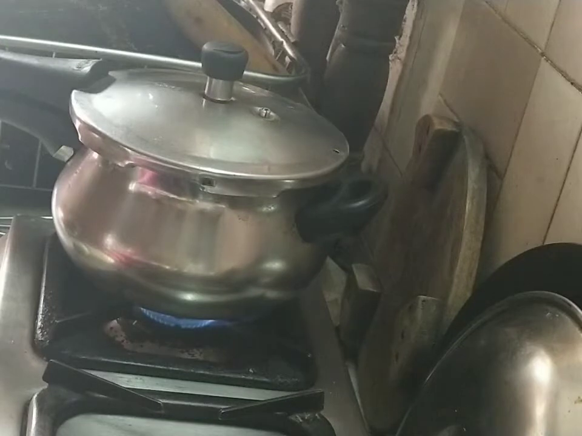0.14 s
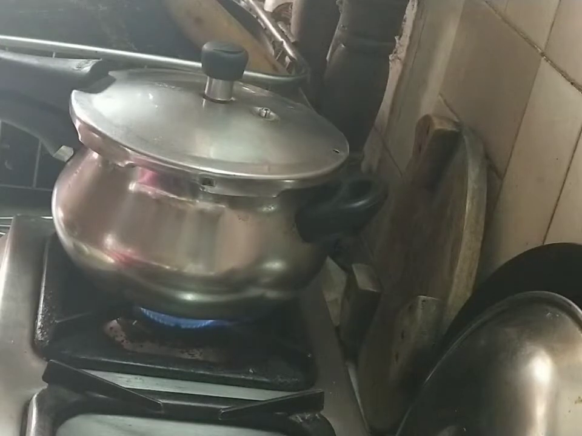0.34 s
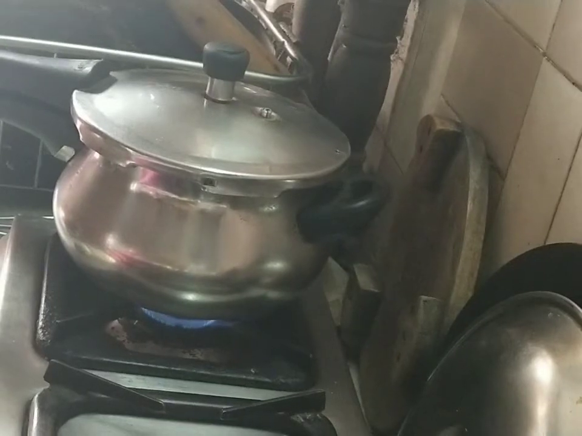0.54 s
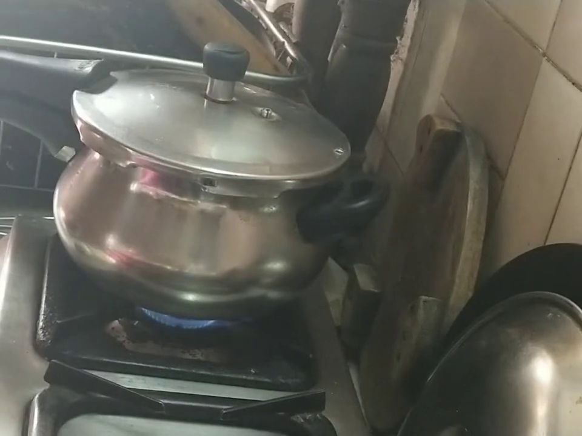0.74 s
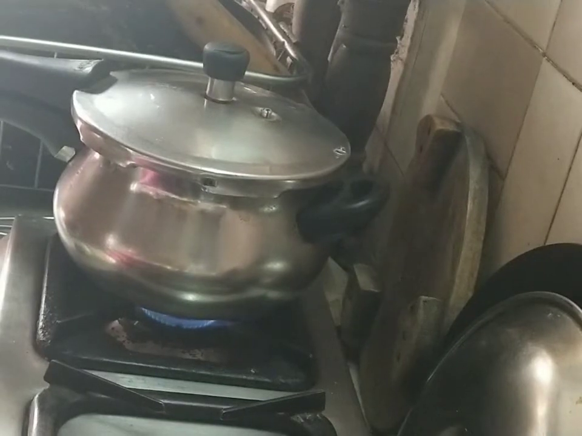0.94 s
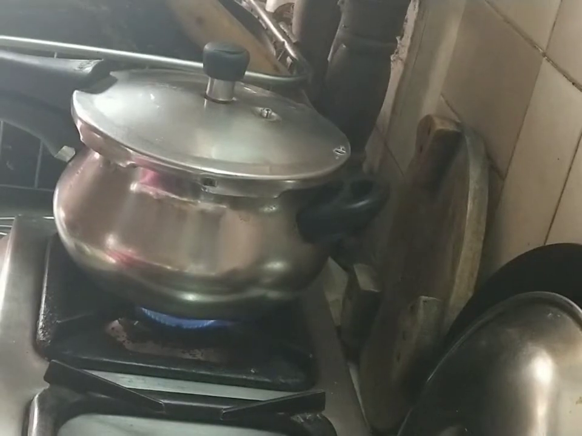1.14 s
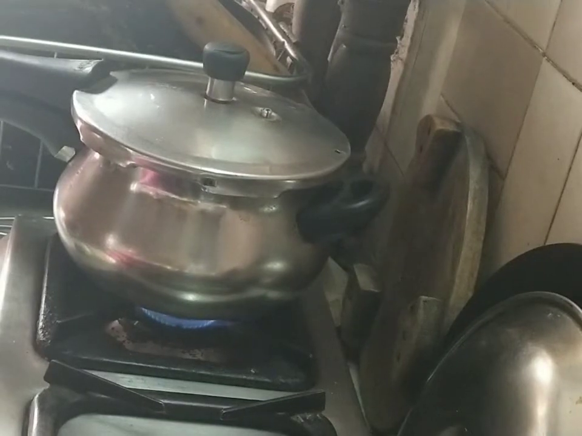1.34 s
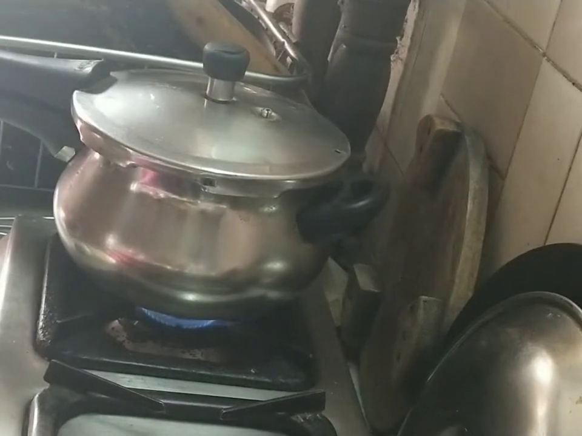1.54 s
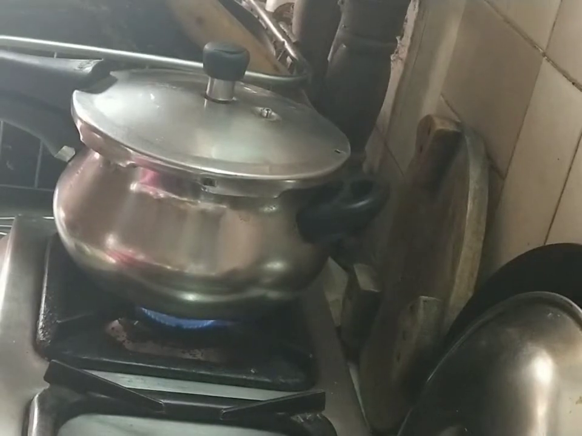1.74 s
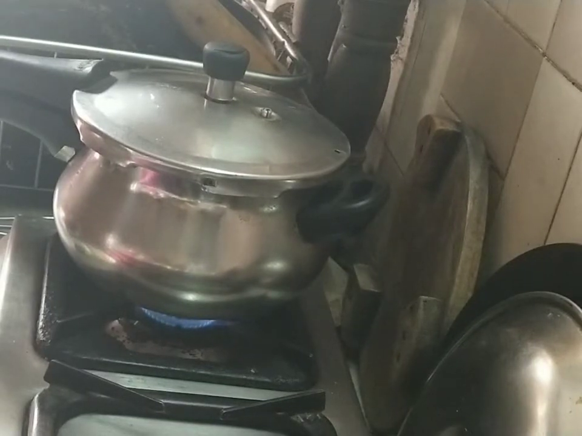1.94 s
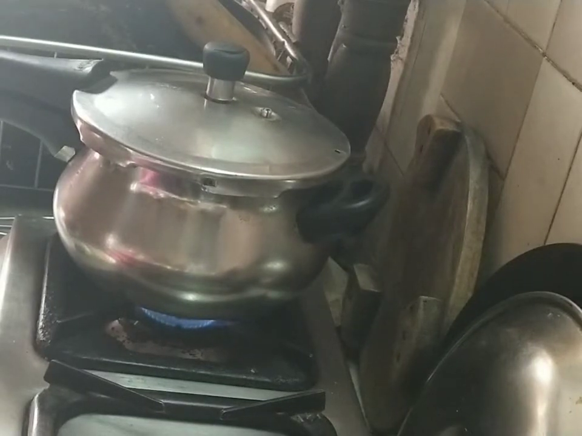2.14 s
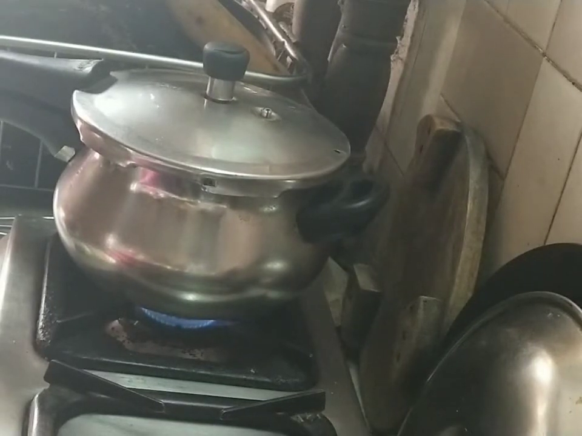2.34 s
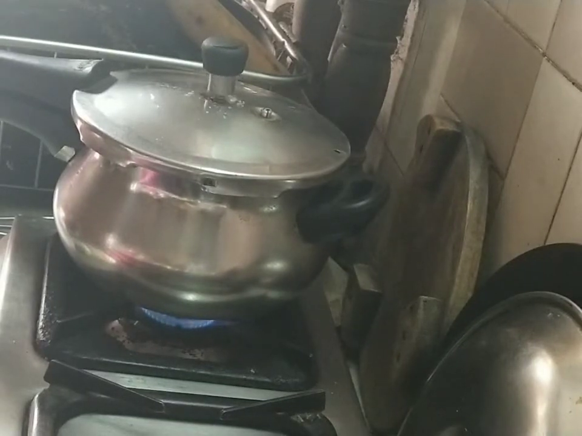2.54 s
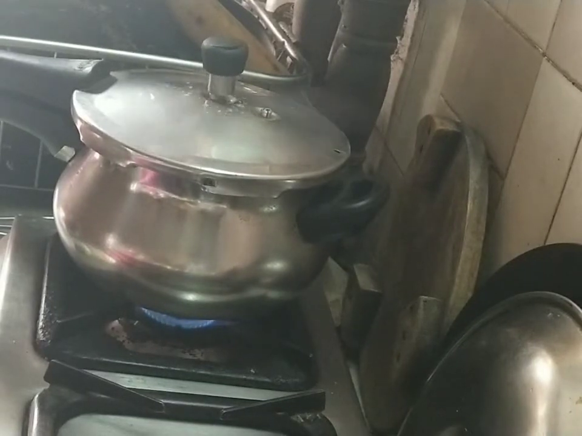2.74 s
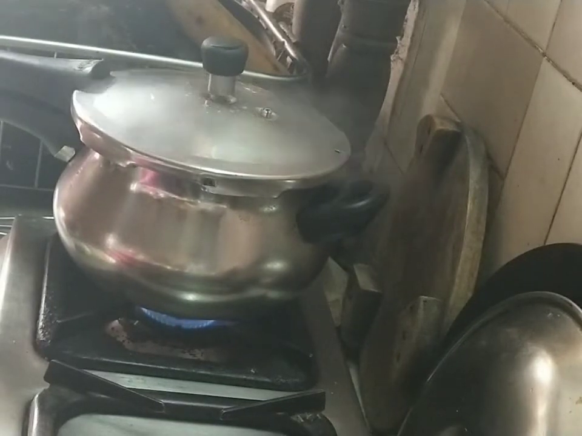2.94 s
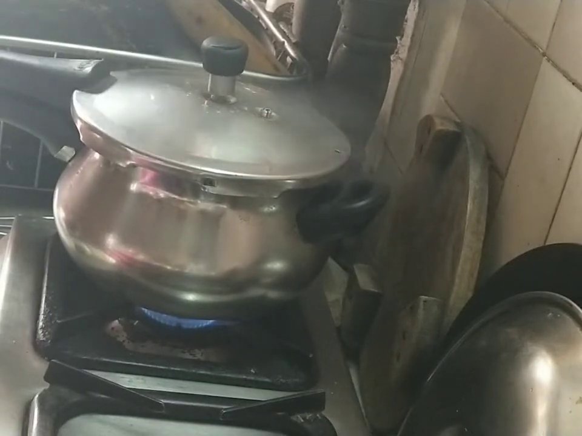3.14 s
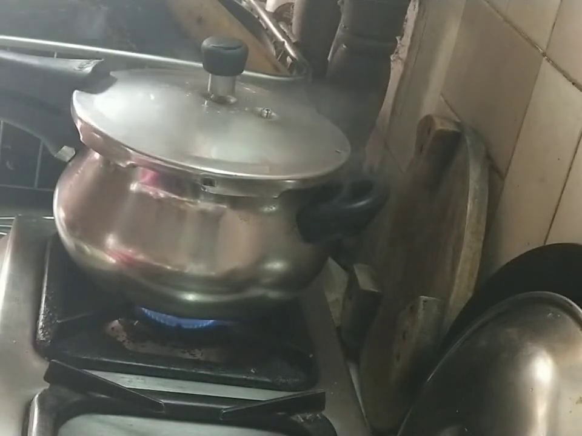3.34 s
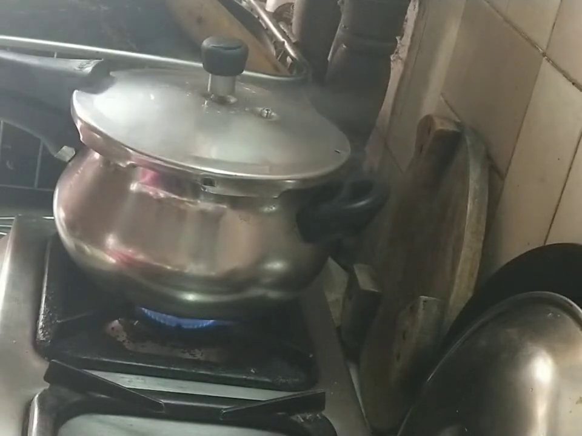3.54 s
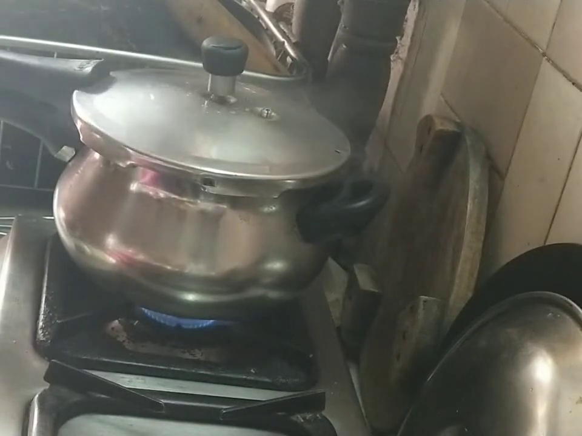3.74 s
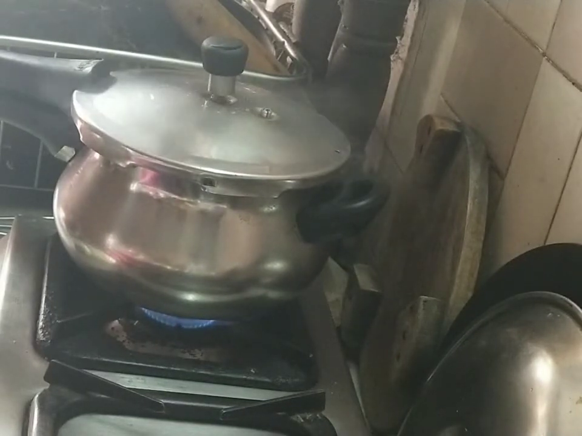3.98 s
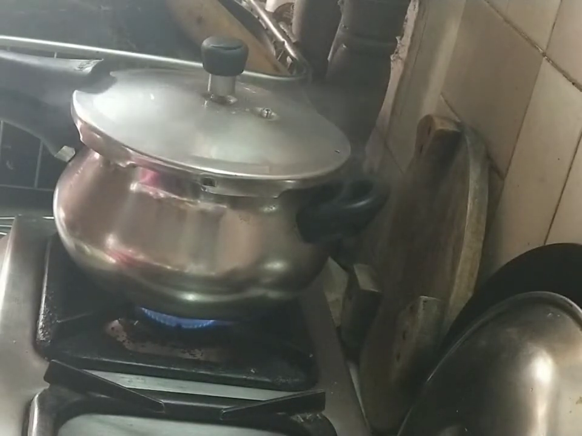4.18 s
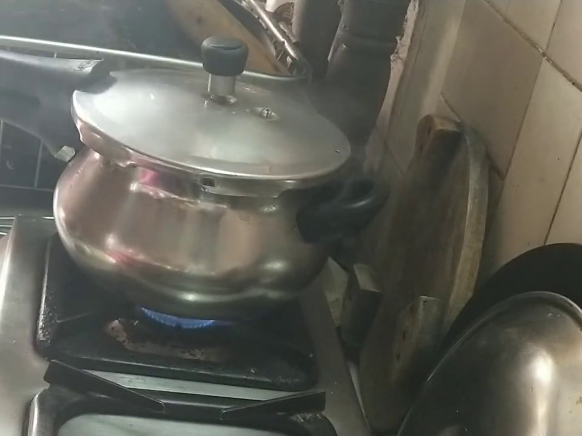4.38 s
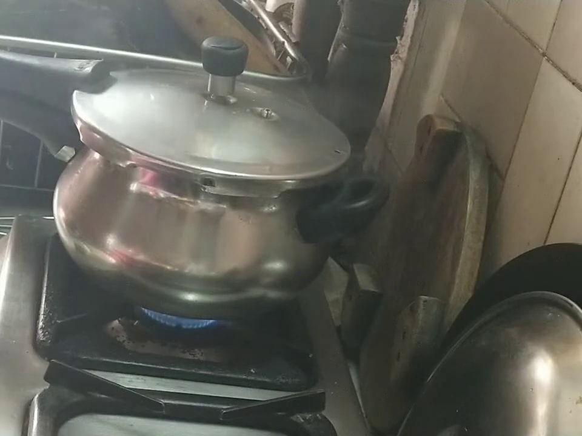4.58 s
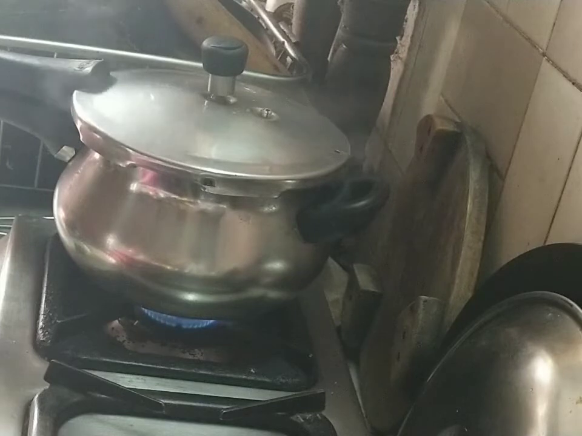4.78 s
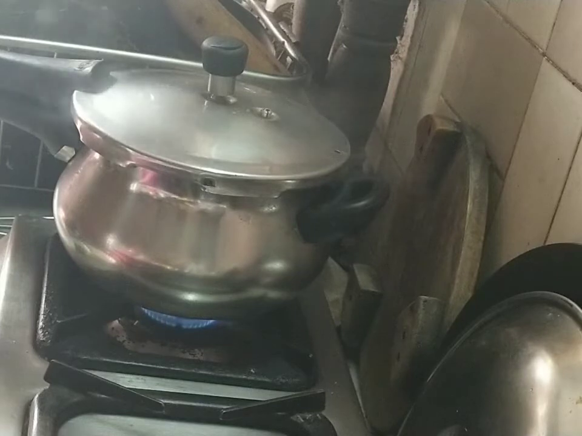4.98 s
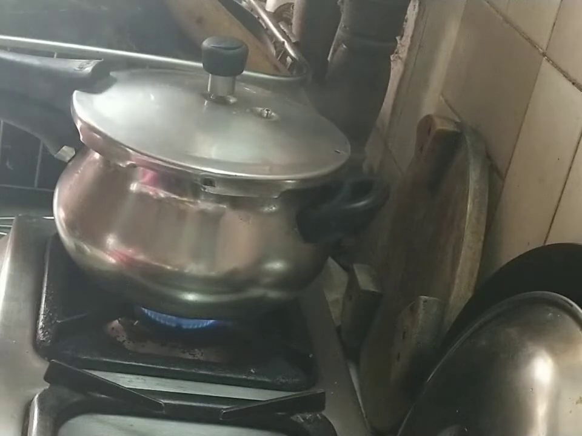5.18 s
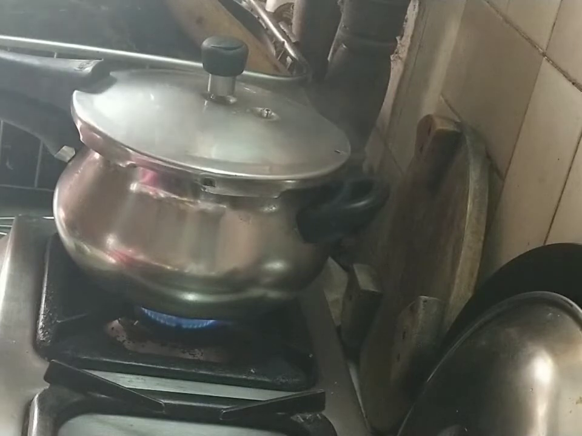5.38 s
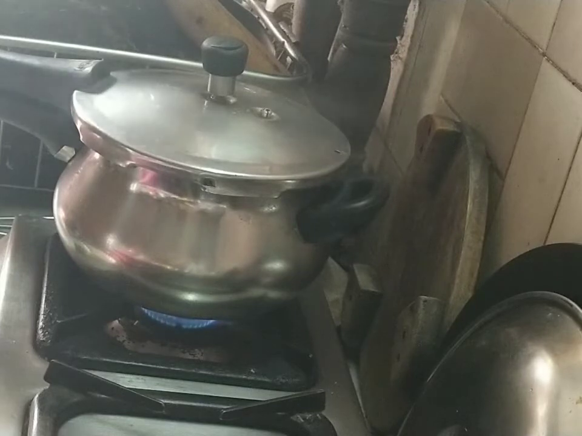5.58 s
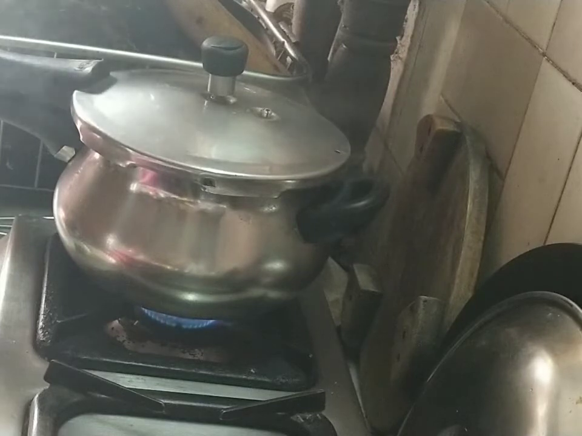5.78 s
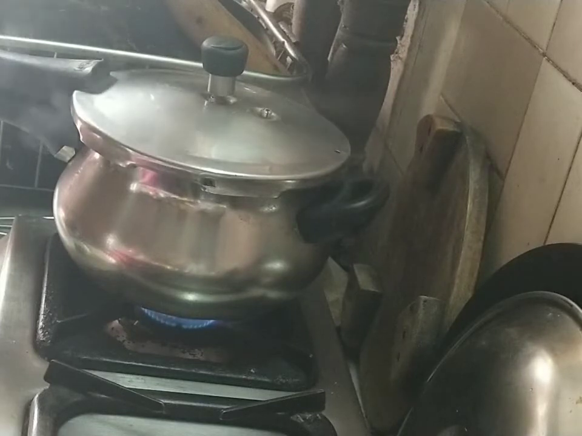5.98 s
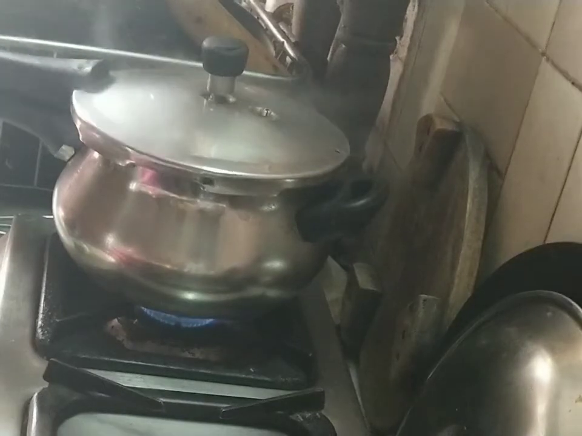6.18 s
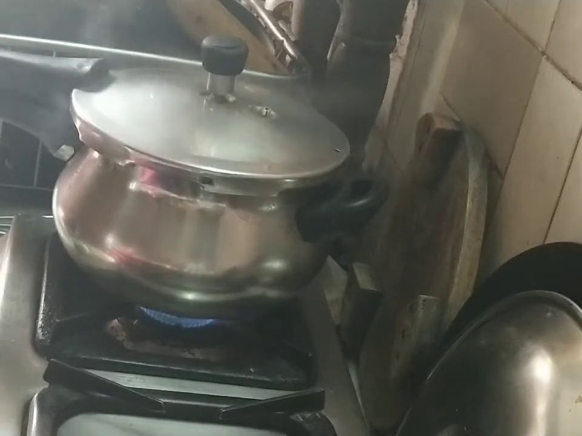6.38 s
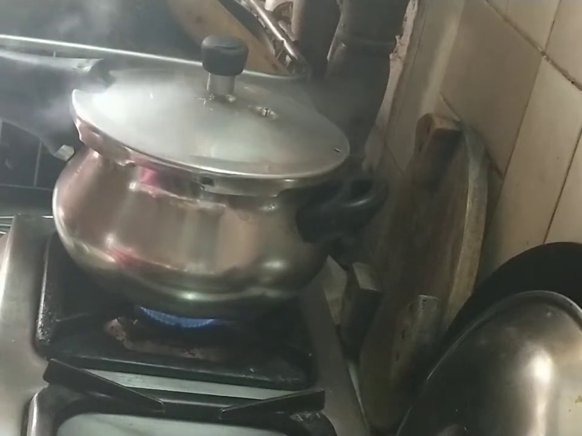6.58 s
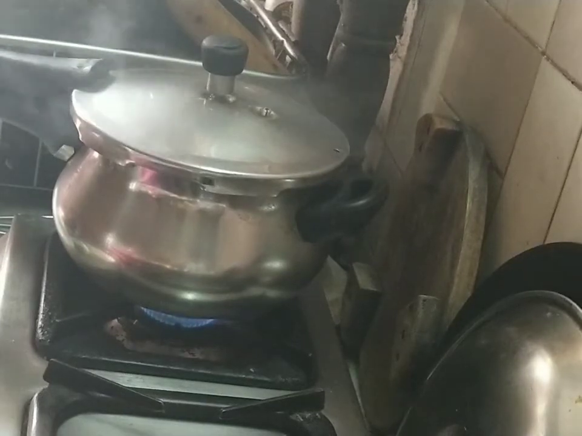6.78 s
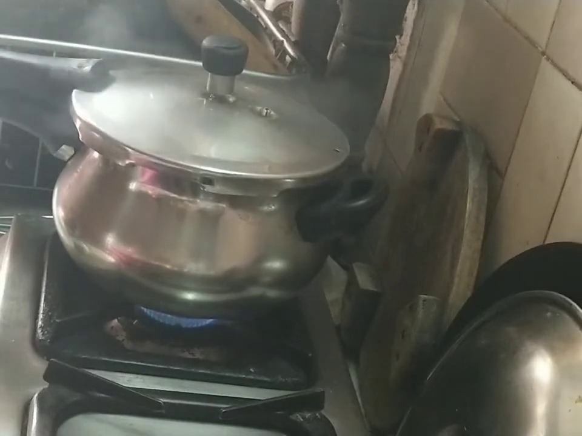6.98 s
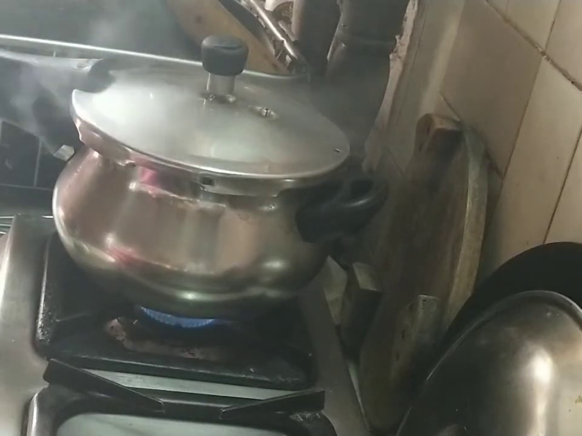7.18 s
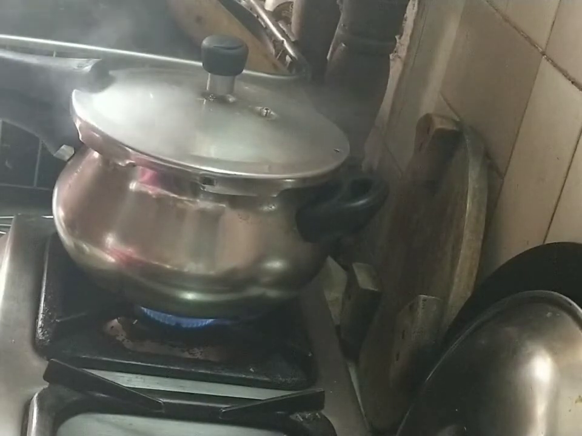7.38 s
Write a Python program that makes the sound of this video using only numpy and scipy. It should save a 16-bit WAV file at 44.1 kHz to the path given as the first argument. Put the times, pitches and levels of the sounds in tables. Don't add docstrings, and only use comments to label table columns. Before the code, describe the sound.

Pot on a gas flame: soft hiss and tiny metal clinks, an abrupt change, then a valve lifts and steam rushes out harshly until the end.

```python
import sys
import numpy as np
from scipy import signal
from scipy.fft import rfft, irfft, next_fast_len
from scipy.io import wavfile
from scipy.ndimage import uniform_filter1d, map_coordinates

SR = 44100
rng = np.random.default_rng(int(sys.argv[2]) if len(sys.argv) > 2 else 0)


def put_to_file(sound):
    columns = np.atleast_2d(sound).T
    safe = np.clip(columns, -1, 1)
    whole_steps = np.round(safe * 32767)
    wavfile.write(sys.argv[1], SR, whole_steps.astype(np.int16))


def boost(x):
    u = np.asarray(x, float) / 20
    return 10 ** u


N = 327222
TIME = np.arange(N) / SR
JUMP_S = 1.4705
# (right port later by [s], level [dB], left louder by [dB])
PATHS = [(.00016, -0.5, 5.2), (-.00034, -2.5, -0.5), (-.00007, -3, -2), (.00043, -5.5, 8)]


def unit(x):
    return x / np.sqrt(np.mean(x ** 2) + 1e-20)


def along(points, hz):
    f, value = np.transpose(points)
    return np.interp(np.log(hz + 1), np.log(f + 1), value)


def curves(rows):
    s, *columns = np.transpose(rows)
    return [np.interp(TIME, s, column) for column in columns]


def wobble(rate):
    return map_coordinates(rng.standard_normal(int(N * rate / SR) + 4), [TIME * rate])


def filtered(x, response):
    m = next_fast_len(N + SR // 2)
    return irfft(rfft(x, m) * response(np.fft.rfftfreq(m, 1 / SR)), m)[..., :N]


def turbulence(patchy_db, channels=1):
    z = signal.stft(rng.standard_normal((channels, N)), nperseg=512)[2]
    field = uniform_filter1d(rng.standard_normal(z.shape[1:]), size=8, axis=0)
    field = uniform_filter1d(field, size=10, axis=1)
    patchy = z * boost(patchy_db * unit(field))
    return unit(signal.istft(patchy, nperseg=512)[1][:, :N])


def jet():
    # (frequency [Hz], level [dB per Hz])
    leak_spectrum = [(410, -49), (700, -19), (943, -25), (1300, -23), (1410, -20.5), (2830, -19),
                     (3380, -24), (3800, -17.5), (5200, -12.5), (6910, 0.5), (8720, -17.5), (9790, -12),
                     (11600, -19), (14100, -15), (15400, -15.5)]
    # (frequency [Hz], level [dB per Hz])
    roar_spectrum = [(180, -42), (300, -20), (951, -19), (1780, -14.5), (1930, -16), (3220, -8.5),
                     (3920, -8.5), (4470, -5.5), (4940, -9.5), (7340, 2.5), (8510, -8), (10700, -11.5),
                     (11800, -11.5), (13500, -12.5), (15400, -10)]
    # (time [s], level [dB])
    flow = [
        (1.48, -38.5),
        (1.506, -37),
        (1.874, -36),
        (2.05, -37),
        (2.37, -31.5),
        (2.44, -25.5),
        (2.506, -13),
        (2.62, -14.6),
        (7.42, -14.7),
    ]
    lift_s, fizz_settles_s = 2.47, .06
    leak_fizz_db, lifting_fizz_db, roar_fizz_db = .7, -1.5, 5.3
    leak_pan_db, roar_pan_db = 1.365, -.325

    level_db, = curves(flow)
    lift = np.clip((level_db + 30.5) / 17, 0, 1) * np.pi / 2
    leak = unit(filtered(turbulence(1.4, len(PATHS)), lambda hz: boost(along(leak_spectrum, hz))))
    roar = unit(filtered(turbulence(0.83, len(PATHS)), lambda hz: boost(along(roar_spectrum, hz))))
    steam = np.cos(lift) * leak + np.sin(lift) * roar

    fizz = filtered(steam, lambda hz: 1 / (1 + (8800 / (hz + 1)) ** 12))
    building = np.clip((level_db + 36) / 5, 0, 1)
    opened = 1 - np.exp(-np.clip(TIME - lift_s, 0, None) / fizz_settles_s)
    fizz_db = leak_fizz_db + building * (lifting_fizz_db - leak_fizz_db)
    fizz_db = fizz_db + opened * (roar_fizz_db - lifting_fizz_db) + .3 * wobble(3)
    steam = steam + (boost(fizz_db) - 1) * fizz

    flutter_db = .15 * wobble(2) + .25 * wobble(9) + .4 * wobble(45) + .4 * wobble(300)
    pan_db = leak_pan_db + opened * (roar_pan_db - leak_pan_db)
    lean_db = np.array([pan_db, -pan_db]) / 2
    return boost(level_db + lean_db - 4) * surfaces(kitchen_ways(steam * boost(flutter_db), wet_db=-3.5))


def kitchen_ways(parts, wet_db):
    # (frequency [Hz], t60 [s])
    tiles = [(300, 0.31), (3000, 0.37), (8000, 0.5), (15000, 0.17)]
    m = next_fast_len(N + SR // 2)
    f, ports = np.fft.rfftfreq(m, 1 / SR), np.array([[-.5], [.5]])
    heard = 0
    for part, (lag, db, pan_db) in zip(rfft(parts, m), PATHS):
        hz, t, z = signal.stft(rng.standard_normal((2, SR // 2)), SR, nperseg=256)
        decay = boost(-60 * t / along(tiles, hz)[:, None])
        tail = signal.istft(z * decay, SR, nperseg=256)[1]
        direct = boost(db - ports * pan_db) * np.exp(-2j * np.pi * f * ports * lag)
        reverb = boost(wet_db) * rfft(tail / np.linalg.norm(tail[0]), m)
        heard = heard + part * (direct + reverb)
    return irfft(heard, m)[:, :N]


def surfaces(pair):
    # (frequency [Hz], width [Hz], gain at each port [dB], further gain in the sum [dB])
    combs = [(2670, 120, -3, 1.5), (3440, 140, -1.5, -1), (3690, 130, 4.5, 0), (3830, 80, -1, -1.5),
             (5110, 210, 0, -3), (8800, 180, -1.5, 0), (7540, 150, 2, 0), (7760, 300, -2.5, 0),
             (10900, 500, -.5, -1.5), (13750, 700, -1.5, -2.5), (15280, 200, 3.5, 4)]

    def bump(f, column):
        return boost(sum(row[column] / (1 + (2 * (f - row[0]) / row[1]) ** 2) for row in combs))

    mid, side = (pair[0] + pair[1]) / 2, (pair[0] - pair[1]) / 2
    colour = lambda f: bump(f, 2) * np.array([bump(f, 3), 1 + 0 * f])
    mid, side = filtered(np.array([mid, side]), colour)
    return np.array([mid + side, mid - side])


def port_thump(hz):
    resonance = (2 * np.pi / SR) ** 2 * (85 ** 2 - hz ** 2 + 1j * hz * 75)
    low_cut = (1j * hz / (48 + 1j * hz)) ** 2
    return 2j * np.pi * hz / SR / (1 + 1j * hz / 2000) / resonance * low_cut


def draught():
    # (peak time [s], half length [s], left level [dB], right level [dB])
    gusts = [
        (2.7, .15, -19, -28),
        (3.17, .12, -27, -38),
        (3.52, .15, -27, -33),
        (4.0, .3, -29, -41),
        (4.48, .1, -30, -39),
        (4.88, .1, -33, -41),
        (5.6, .12, -37, -43),
        (6.22, .08, -30, -33),
        (6.58, .07, -31, -36),
        (7.0, .12, -31, -38),
    ]
    calm_db = [
        [-38],
        [-43],
    ]
    # (time [s], level [dB], push or pull [sign])
    thumps_left = [(2.558, -13, -1), (2.622, -9.5, 1), (2.666, -7.5, 1), (2.72, -11, 1), (2.909, -13.5, 1),
                   (2.992, -16, 1), (3.058, -15.5, 1), (3.117, -16, -1), (3.17, -15, 1), (3.277, -11.5, 1),
                   (3.309, -9.5, -1), (3.48, -16.5, -1), (3.61, -9, 1), (3.716, -14.5, 1),
                   (3.778, -10.5, 1), (3.861, -16, 1), (3.999, -9, 1), (4.026, -13, -1), (4.1, -11, -1),
                   (4.139, -14.5, -1), (4.271, -15, 1), (4.402, -12, 1), (4.93, -22, 1), (5.689, -19, 1),
                   (6.198, -12, 1), (6.239, -12, 1), (6.556, -9, 1), (6.914, -9, 1), (6.938, -11.5, -1),
                   (7.106, -21, -1)]
    # (time [s], level [dB], push or pull [sign])
    thumps_right = [(2.528, -16.5, 1), (2.616, -18, 1), (2.758, -16, 1), (2.782, -12.5, -1), (2.83, -18, 1),
                    (3.089, -18, -1), (3.184, -17, -1), (3.238, -19, -1), (6.244, -21, -1),
                    (6.335, -22, -1)]

    swells = sum(boost([[left_db], [right_db]]) * np.exp(-((TIME - s) / half) ** 2)
                 for s, half, left_db, right_db in gusts)
    gust = np.clip((TIME - 2.46) / 0.065, 0, 1) * (boost(calm_db) + swells)
    steps = rng.standard_normal((2, N)) * (rng.random((2, N)) < 500 / SR)
    lumps = boost(np.array([0.93 * wobble(30), 3.7 * wobble(30)]))
    eddies = boost(-4.8) * unit(filtered(steps, port_thump)) * lumps

    blur = lambda hz: (hz / 160) ** 2 / (1 + (hz / 160) ** 2.08) / (1 + (hz / 1800) ** 2)
    rush = boost(-1.5) * unit(filtered(turbulence(0.71, channels=2), blur)) * lumps

    big = np.zeros((2, N))
    for side, rows in enumerate((thumps_left, thumps_right)):
        s, db, push = np.transpose(rows)
        big[side, np.round(s * SR).astype(int)] = np.sign(push) * boost(db + 5)
    return gust * (eddies + rush) + filtered(big, port_thump)


def ringing(notes):
    out, t = np.zeros((2, N)), np.arange(SR // 2) / SR
    for s, db, hz, t60, rise, pan_db in notes:
        start = rng.uniform(0, 2 * np.pi, (2, 1))
        waver = np.cumsum(rng.standard_normal((2, len(t))), axis=1) * .055
        smear = boost(1.6 * unit(uniform_filter1d(rng.standard_normal((2, len(t))), size=300)))
        swing = np.sin(2 * np.pi * hz * t + start + waver)
        note = boost(db + 6.2 - 60 * t / t60) * (1 - np.exp(-t / rise)) * swing
        out[:, round(s * SR):][:, :len(t)] += note * smear * boost([[pan_db / 2], [-pan_db / 2]])
    return out


def lid_knock():
    # (frequency [Hz], level [dB], t60 [s])
    lid = [(460, -51, .08), (720, -44, .056), (970, -44, .06), (1300, -44, .05), (1930, -44, .05),
           (2650, -51, .05), (3680, -48, .041), (5000, -48, .06), (7270, -46, .026)]
    knock_s, rise_s, pan_db = .387, .0012, -4
    return ringing([(knock_s, db, hz, t60, rise_s, pan_db) for hz, db, t60 in lid])


def lid_squeak():
    start_s, lasts_s, level_db, pan_db = .395, .11, -59, -4
    low_hz, climb_hz = 4950, 520
    slide = np.clip((TIME - start_s) / lasts_s, 0, 1)
    turn = 2 * np.pi * np.cumsum(low_hz + climb_hz * np.sqrt(slide)) / SR + 1.2 * wobble(150)
    swell = np.sqrt(np.abs(np.sin(np.pi * slide))) * (slide < 1)
    return boost(level_db + 2.2 * wobble(70) + [[pan_db / 2], [-pan_db / 2]]) * swell * np.sin(turn)


def clinks():
    # (time [s], peak level [dB], frequency [Hz], t60 [s], left louder by [dB])
    pings = [(.05, -53, 1860, .3, 4), (.05, -57, 2600, .12, 0), (.425, -53, 985, .18, -7),
             (.8, -45, 1840, .1, 4), (.815, -51, 1850, .45, 2), (.845, -53, 2004, .14, 2),
             (.85, -56, 3620, .1, 1), (1.0, -57, 1090, .3, -3), (1.34, -55, 603, .3, 7),
             (1.486, -44.5, 1400, .18, 2), (1.51, -51, 1270, .24, -2), (2.115, -52, 920, .25, 0),
             (2.33, -49, 734, .3, 0), (2.45, -34, 752, .3, 2)]
    rise_share = .06
    return ringing([(s, db, hz, t60, rise_share * t60, pan_db) for s, db, hz, t60, pan_db in pings])


def scuffs():
    # (time [s], level [dB], centre frequency [Hz], t60 [s], rise [s])
    contacts = [
        (.042, -44.5, 1600, .2, .008),
        (.386, -45, 1800, .06, .001),
        (.8, -58, 2000, .2, .004),
        (.53, -60, 4000, .1, .005),
        (1.47, -36, 550, .02, .0003),
        (2.38, -47, 900, .9, .05),
    ]
    out, t = np.zeros((2, N)), np.arange(SR // 2) / SR
    for s, db, hz, t60, rise in contacts:
        band = signal.butter(1, [hz / SR, 3 * hz / SR], "bandpass")
        broad = unit(signal.lfilter(*band, rng.standard_normal((2, len(t)))))
        out[:, round(s * SR):][:, :len(t)] += broad * boost(db - 60 * t / t60) * (1 - np.exp(-t / rise))
    return out


def engine():
    # (time [s], firing rate [Hz], drone level [dB])
    revs = [
        (0, 112, -49),
        (.15, 107.5, -51),
        (.5, 105.7, -48),
        (.6, 109, -56),
        (.8, 107, -57),
        (.92, 106.5, -43),
        (.97, 106.5, -45),
        (1.13, 106, -39.5),
        (1.46, 105.3, -39),
    ]
    whine_hz, whine_from_s, whine_rise_s, whine_db, whine_grows_db_per_s = 3290, .8, .05, -69.5, 6
    hz, drone_db = curves(revs)
    turn = 2 * np.pi * np.cumsum(hz) / SR
    octave = boost(-22 + 2.1 * wobble(8)) * np.sin(2 * turn + 1.2 * wobble(11.5))
    drone = np.sin(turn + 0.59 * wobble(14)) + octave

    since = TIME - whine_from_s
    loaded = np.clip(since / whine_rise_s, 0, 1) * boost(whine_db + whine_grows_db_per_s * since)
    narrow = lambda f: (1j * f * 50 / (whine_hz ** 2 - f ** 2 + 1j * f * 50)) ** 2
    whine = 0.55 * unit(filtered(rng.standard_normal((2, N)), narrow))
    whine = whine + 1.1 * np.sin(2 * np.pi * whine_hz * TIME + 1.6 * wobble(40))
    return np.sqrt(2) * boost(drone_db + 1.1 * wobble(18)) * drone + loaded * whine


def diffuse(gain, patchy_db):
    # (frequency [Hz], correlation [-1 to 1])
    alike = [(60, 0.93), (180, 1), (550, 0.64), (1650, 0.027), (4970, 0.044), (15000, -0.04)]
    turn = lambda hz: np.arccos(np.clip(along(alike, hz), -1, 1)) / 2
    spread = lambda hz: gain(hz) * [np.cos(turn(hz)), np.sin(turn(hz))]
    mid, side = filtered(turbulence(patchy_db, channels=2), spread)
    return unit(np.array([mid + side, mid - side]))


def kitchen():
    # (frequency [Hz], level [dB per Hz])
    rumble_spectrum = [(15, -47), (40, -45), (80, -15.5), (160, -13.5), (300, -21), (450, -24), (700, -29),
                       (1000, -40), (1500, -120)]
    # (frequency [Hz], level [dB per Hz])
    seep_spectrum = [(240, -40), (400, -17.5), (900, -10), (2000, -14), (3500, -17), (5500, -19.5),
                     (7300, -11.5), (8600, -19.5), (12000, -24), (15400, -25.5)]
    # (frequency [Hz], width [Hz], level [dB])
    room_modes = [(53.4, 6.7, -32.5), (106.8, 15, -5.5), (134, 12.7, -0.5), (209, 21, -5),
                  (251.3, 26, -7.5), (291, 13, -16), (370, 14, -16.5), (448, 16, -16.5), (552, 31, -20.5)]
    after = TIME > JUMP_S
    rumble_db = np.where(TIME < JUMP_S, -49.5, -49) + 1.5 * wobble(8)
    pot_db = 8 * np.clip(TIME - 1.9, -.4, .5) * after
    deep_db = np.where(TIME < JUMP_S, -62, -54) + pot_db + 1.8 * wobble(6)

    hiss = boost(-53.5) * diffuse(lambda hz: boost(along(seep_spectrum, hz)), patchy_db=0.4)
    modes = lambda f: sum(boost(2 * db) / (1 + (2 * (f - hz) / width) ** 2) ** 2 for hz, width, db in room_modes)
    hum = lambda f: np.sqrt(boost(2 * along(rumble_spectrum, f)) + modes(f))
    rumble = boost(rumble_db) * diffuse(hum, patchy_db=1.0)
    deep = boost(deep_db) * diffuse(lambda f: (f / 60) ** 2.4 / (1 + (f / 72) ** 5.5), patchy_db=1.5)
    duck_db = -6.5 * np.clip((TIME - 2.45) / .1, 0, 1)
    return boost(duck_db) * (rumble + deep + hiss)


def scene():
    handled = lid_knock() + lid_squeak() + clinks() + scuffs()
    return np.where(TIME < JUMP_S, engine(), jet()) + draught() + handled + kitchen()


def low_pass(x):
    return signal.sosfilt(signal.butter(12, 16650, fs=SR, output="sos"), x)


def record(dry):
    top_hz = 15490
    rounded = dry / (1 + np.abs(dry / .92) ** 5) ** (1 / 5)
    kept = filtered(rounded, lambda hz: np.clip((top_hz - hz) / 120 + .5, 0, 1))
    return low_pass(kept)


dry = scene()
out = record(dry)
put_to_file(out)
```